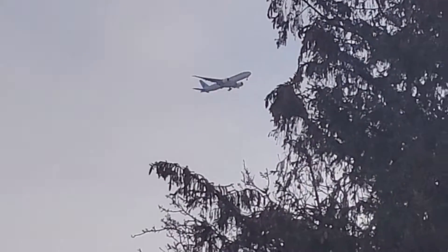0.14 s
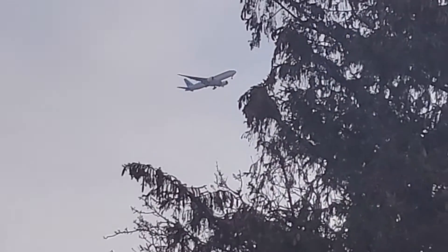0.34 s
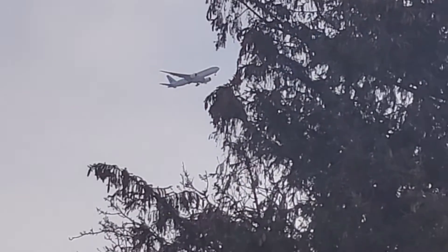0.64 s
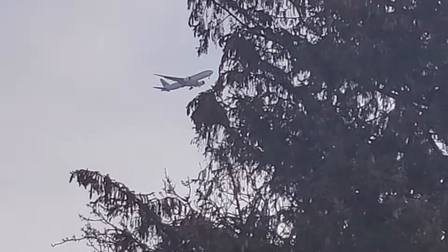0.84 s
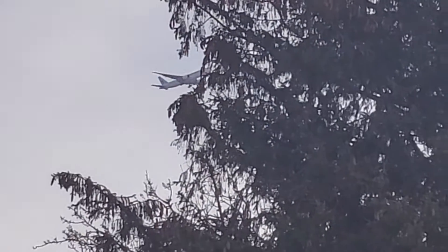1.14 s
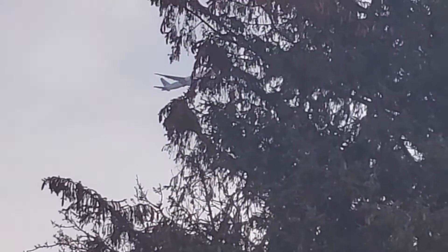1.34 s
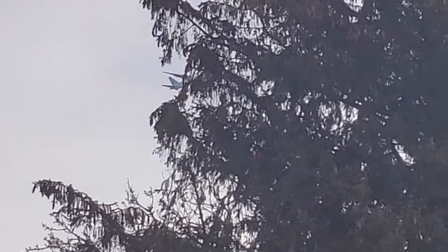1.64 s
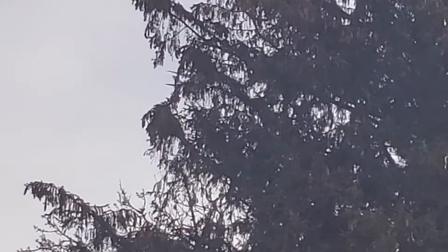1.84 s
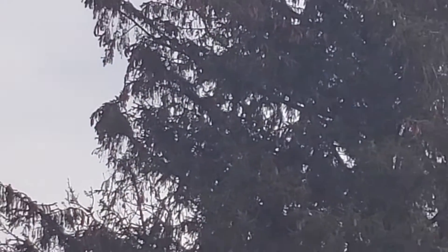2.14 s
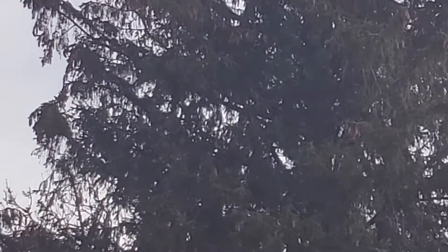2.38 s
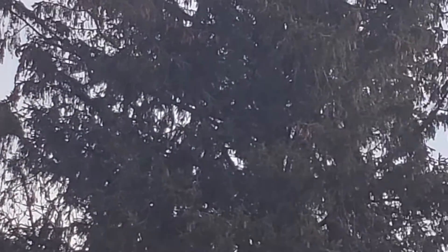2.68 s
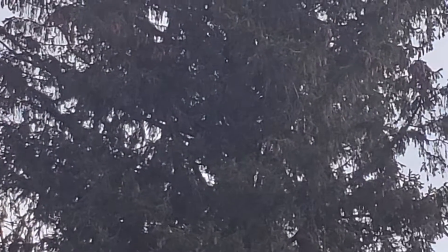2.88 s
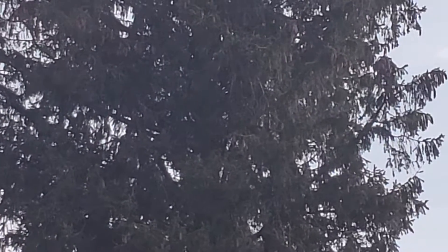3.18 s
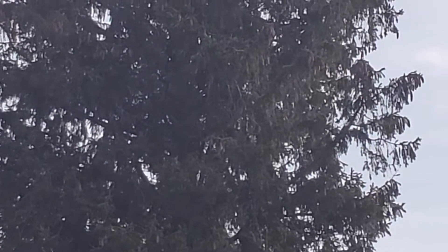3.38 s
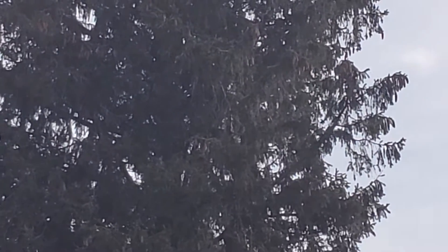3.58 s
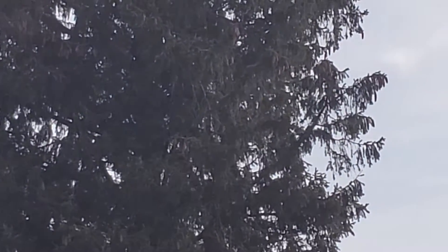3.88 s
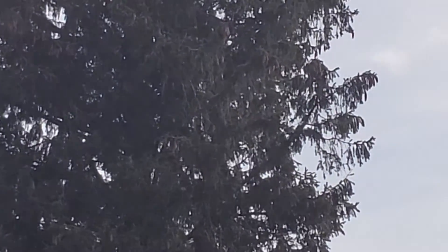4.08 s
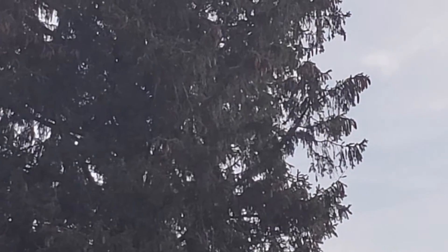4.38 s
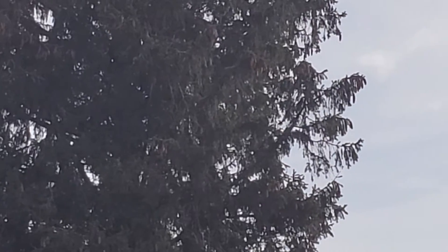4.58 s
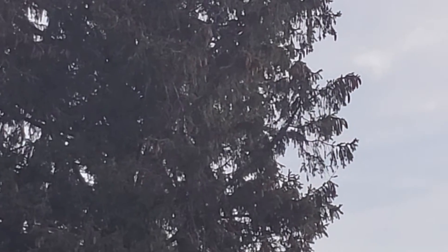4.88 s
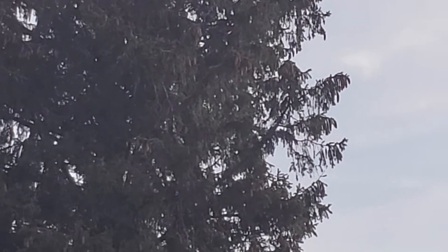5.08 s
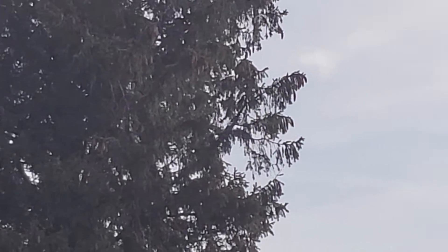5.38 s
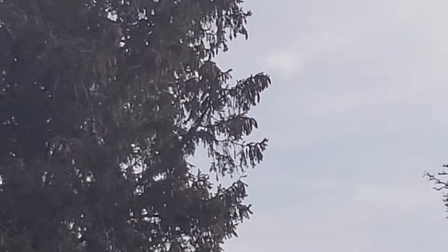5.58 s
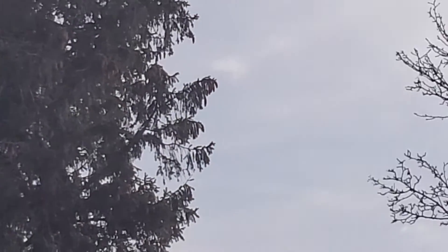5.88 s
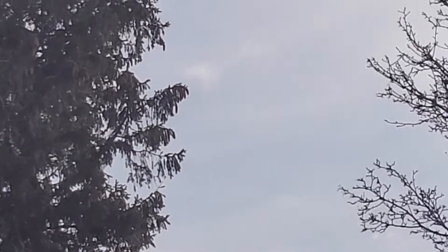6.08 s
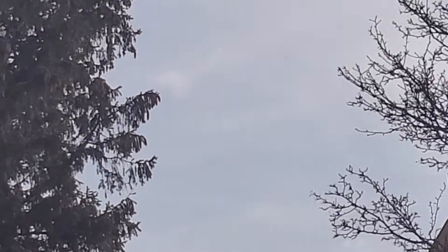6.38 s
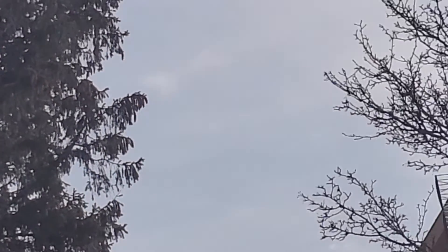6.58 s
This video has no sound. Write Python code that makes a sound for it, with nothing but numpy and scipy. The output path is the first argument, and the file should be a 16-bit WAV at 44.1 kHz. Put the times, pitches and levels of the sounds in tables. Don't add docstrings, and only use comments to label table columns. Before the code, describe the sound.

A distant jet airliner's deep rumble and wavering roar swell and dip outdoors while sparrows, a tit and far birds chirp among trees.

```python
import sys
import numpy as np
from scipy import signal
from scipy.fft import rfft, irfft, next_fast_len
from scipy.io import wavfile
from scipy.ndimage import uniform_filter1d, map_coordinates

SR = 44100
rng = np.random.default_rng(int(sys.argv[2]) if len(sys.argv) > 2 else 0)


def level_to_linear(level):
    exponent = np.asarray(level, float) / 20
    return 10 ** exponent


def store_wav(level_fs):
    pcm = np.round(np.clip(np.atleast_2d(level_fs), -1, 1) * 32767)
    wavfile.write(sys.argv[1], SR, pcm.T.astype(np.int16))


N = 296793


def unit(x):
    return x / np.sqrt(np.mean(x ** 2) + 1e-20)


def along(points, hz):
    f, v = np.transpose(points)
    return np.interp(np.log(hz + 1), np.log(f + 1), v)


def curves(rows):
    s, *columns = np.transpose(rows)
    return [np.interp(np.arange(N) / SR, s, column) for column in columns]


def swells(rows, width_s, rest_db):
    s, db = np.transpose(rows)
    t = np.arange(0, N + 512, 256) / SR
    bells = np.exp(-((t - s[:, None]) / width_s) ** 2)
    power = level_to_linear(2 * rest_db) + level_to_linear(2 * db) @ bells
    return np.interp(np.arange(N) / SR, t, 10 * np.log10(power))


def wobble(rate, size=N):
    knots = rng.standard_normal(int(size * rate / SR) + 4)
    return map_coordinates(knots, [np.arange(size) * rate / SR])


def filtered(x, response):
    m = next_fast_len(N + 8192)
    return irfft(rfft(x, m) * response(np.fft.rfftfreq(m, 1 / SR)), m)[..., :N]


def ports(pair, alike, lead, pan_db):
    def mixing(hz):
        turn = np.arccos(np.clip(along(alike, hz), 0, 1)) / 2
        return np.array([np.cos(turn), np.sin(turn)])

    mid, side = filtered(pair, mixing)
    both = np.array([mid + side, mid - side]) * level_to_linear([[pan_db / 2], [-pan_db / 2]])
    return filtered(both, lambda hz: np.exp(.5j * along(lead, hz) * np.array([[1], [-1]])))


def rush(spectrum, patchy_db):
    z = signal.stft(rng.standard_normal((2, N)), nperseg=1024)[2]
    field = uniform_filter1d(rng.standard_normal(z.shape[1:]), size=6, axis=0)
    field = uniform_filter1d(field, size=8, axis=1)
    pair = signal.istft(z * level_to_linear(patchy_db * unit(field)), nperseg=1024)[1][:, :N]
    return unit(filtered(pair, lambda hz: level_to_linear(along(spectrum, hz))))


def evened(pair):
    even_s, share = .055, .5
    power = uniform_filter1d(pair[0] ** 2, round(even_s * SR))
    power = uniform_filter1d(power, round(even_s * SR / 2))
    level = np.abs(power) + 1e-3
    return unit(pair / level ** (share / 2))


def engine_tone(hz, db, width_hz):
    turns = np.exp(2j * np.pi * np.cumsum(hz) / SR)
    pair = [np.real(turns * (wobble(width_hz) + 1j * wobble(width_hz))) for _ in range(2)]
    return level_to_linear(db) * unit(np.array(pair))


def whistle(notes, bow_hz, clear_speed, rasp_hz, flutter_db, edge):
    out = np.zeros(N + SR)
    for s, length, start_hz, end_hz, db in notes:
        u = np.linspace(0, 1, round(length * SR))
        hz = start_hz + (end_hz - start_hz) * u + bow_hz * 4 * u * (1 - u)
        harsh = np.clip(abs(end_hz - start_hz) / length / clear_speed, 0, 1)
        rasp = wobble(rasp_hz, size=len(u)) + 1j * wobble(rasp_hz, size=len(u))
        voice = np.sqrt(1 - harsh) + np.sqrt(harsh / 2) * rasp
        swell = np.sin(np.pi * u) ** edge * level_to_linear(db + 6.5 + flutter_db * wobble(160, size=len(u)))
        out[round(s * SR):][:len(u)] += swell * np.real(voice * np.exp(2j * np.pi * np.cumsum(hz) / SR))
    return out[:N]


def sung(calls, phrase):
    notes = []
    for s, db, pace, *sweep in calls:
        for delay, length, start_hz, end_hz, more_db in phrase:
            centre = (start_hz + end_hz) / 2
            half = (start_hz - end_hz) / 2 * np.prod(sweep)
            notes.append((s + delay * pace, length, centre + half, centre - half, db + more_db))
    return notes


# frequency in Hz, time to fall by 60 dB in seconds.
TREE_DECAY = [(2600, .27), (3300, .42), (4200, .85), (5000, .9), (8000, .45)]


def among_trees(x, lag_s, pan_db, wet_db, slap_s, slap_db):
    hz, t, z = signal.stft(rng.standard_normal((2, SR)), SR, nperseg=256)
    decay = level_to_linear(-60 * t / along(TREE_DECAY, hz)[:, None])
    tail = signal.istft(z * decay * (hz > 1500)[:, None], SR, nperseg=256)[1]
    tail = tail / np.linalg.norm(tail[0])
    wet = signal.fftconvolve(np.pad(x, (500, 0))[None], tail, axes=1)[:, :N]
    side = np.array([[1], [-1]])

    def path(f):
        echo = 1 - level_to_linear(slap_db) * np.exp(-2j * np.pi * f * slap_s)
        return np.exp(-1j * np.pi * f * lag_s * side) / echo

    return filtered(x, path) * level_to_linear(side * pan_db / 2) + level_to_linear(wet_db) * wet


# frequency in Hz, density in dB per Hz.
HISS_SPECTRUM = [(4410, -36.5), (7500, -6), (8570, -2), (9750, -3.5), (12500, -1), (15100, -0.5),
                 (15700, -10)]


def microphone_hiss():
    return level_to_linear(-81) * rush(HISS_SPECTRUM, patchy_db=1.5)


# frequency in Hz, density in dB per Hz.
CHORUS_SPECTRUM = [(1240, -18.5), (2100, -7.5), (3100, -6.5), (3820, -7), (4250, -11.5), (4900, -22.5),
                   (6370, -49.5), (10800, -120)]
CHORUS_TOP_SPECTRUM = [(2820, -28.5), (4800, -4.5), (6500, -13), (7200, -20), (9360, -51.5), (15800, -120)]
# time in seconds, level in dB.
FLURRIES = [(.67, -64), (1.1, -67), (1.85, -62), (2.46, -64.5), (2.74, -66), (3.4, -64.5), (3.65, -64),
            (4.25, -63.5), (4.83, -62), (5.5, -65), (6.0, -62.5), (6.6, -64.5)]


def bird_chorus():
    low_db = swells(FLURRIES, width_s=.23, rest_db=-66.5)
    top_db = low_db.mean() + 3.1 * (low_db - low_db.mean()) - 16
    blur = level_to_linear(low_db) * rush(CHORUS_SPECTRUM, patchy_db=3.0)
    blur += level_to_linear(top_db) * rush(CHORUS_TOP_SPECTRUM, patchy_db=-4.5)
    return ports(blur, [(2000, .35), (7000, .18)], [(2000, 1.9), (7000, 1.4)], pan_db=4.0)


# start in seconds, length in seconds, start and end pitch in Hz, level in dB.
DISTANT_NOTES = [(.01, 0.071, 2860, 2580, -60), (.495, 0.078, 2280, 3000, -53.5),
                 (.54, 0.038, 2950, 2630, -54), (.565, 0.072, 2680, 3030, -54),
                 (1.96, .04, 3350, 3200, -60), (2.262, .075, 3450, 2800, -52),
                 (2.343, .032, 3720, 2950, -52), (2.372, .025, 3050, 3350, -55),
                 (2.77, 0.067, 4100, 3880, -64), (3.3, .06, 3470, 3430, -71),
                 (3.44, 0.047, 3350, 3250, -64), (4.055, .038, 4200, 3340, -63),
                 (4.79, 0.024, 3500, 3570, -52.5), (4.94, .04, 2510, 2500, -61.5),
                 (5.655, .075, 2750, 4300, -58), (5.725, .04, 3410, 2880, -54),
                 (5.915, 0.031, 4080, 3980, -62.5), (6.06, 0.07, 2690, 2620, -61)]
CHATTER_NOTES = [(1.735, 0.071, 6400, 4700, -67), (2.8, 0.084, 3480, 3420, -52.5),
                 (3.48, 0.043, 3630, 2900, -54.5), (3.965, 0.036, 3490, 4080, -55.5),
                 (4.17, 0.078, 4110, 2960, -54), (5.6, 0.083, 5150, 4560, -54.5),
                 (5.67, 0.11, 4040, 3920, -52.5), (5.77, 0.032, 3400, 4040, -54.5),
                 (6.63, 0.035, 3210, 2980, -57.5), (6.66, 0.079, 8350, 7450, -87)]
ARCHED_CALLS = [
    (1.712, .11, 3500, 3600, -63),
    (5.243, .1, 3400, 3300, -62),
]
# start in seconds, level in dB, pace ratio.
FINCH_CALLS = [
    (.47, -67, 1),
    (1.36, -70, 1),
    (4.92, -74, 1),
]
# delay in seconds, length in seconds, start and end pitch in Hz, level in dB.
FINCH_NOTES = [
    (0, 0.06, 2770, 3550, 2.1),
    (0.033, 0.224, 3390, 3280, 0.88),
]


def far_birds():
    clear = DISTANT_NOTES + sung(FINCH_CALLS, FINCH_NOTES)
    far = whistle(clear, bow_hz=0, clear_speed=30000, rasp_hz=400, flutter_db=3, edge=.6)
    far += whistle(ARCHED_CALLS, bow_hz=1240, clear_speed=60000, rasp_hz=400, flutter_db=2.5, edge=.25)
    far += whistle(CHATTER_NOTES, bow_hz=0, clear_speed=900, rasp_hz=1200, flutter_db=1.5, edge=.7)
    return among_trees(level_to_linear(-8) * far, -13.5 / SR, pan_db=3.5, wet_db=-8, slap_s=.045, slap_db=-18)


# start in seconds, level in dB, pace ratio.
TIT_CALLS = [(.458, -59, 1.15), (1.036, -63, 0.95), (1.666, -57, 0.93), (2.252, -59.5, 0.95),
             (2.836, -57, 1.01), (3.631, -55.5, 1.02), (4.752, -60, 0.92), (6.049, -56, .95)]
# delay and length in seconds, start and end pitch in Hz, dB.
TIT_NOTES = [
    (0, .065, 4770, 4700, -1),
    (.005, .06, 9520, 9400, -33),
    (0.069, .07, 6900, 5950, -15),
    (.125, .032, 4330, 4220, -1.5),
    (-.004, .008, 6200, 5300, -18),
    (.121, .01, 6700, 5000, -18),
    (.07, .06, 4760, 4720, -15),
]


def tit():
    song = whistle(sung(TIT_CALLS, TIT_NOTES), bow_hz=20, clear_speed=25000, rasp_hz=600,
                   flutter_db=4, edge=.55)
    return among_trees(song, -2.2 / SR, pan_db=-3.2, wet_db=-9, slap_s=.085, slap_db=-15)


# start and length in seconds, start and end pitch in Hz, level
# in dB.
NEARBY_NOTES = [(1.712, .035, 3550, 4150, -59), (1.728, .035, 5000, 5900, -66),
                (1.742, .032, 4600, 4750, -56), (1.752, .04, 4400, 2600, -58),
                (1.76, .035, 3150, 3000, -60), (1.75, .05, 6100, 6250, -67),
                (1.855, .06, 3050, 3450, -62), (1.915, .028, 2930, 2800, -61),
                (1.12, .045, 6250, 6150, -68), (3.455, .022, 5500, 4800, -63),
                (3.57, .055, 3600, 4460, -58), (3.628, .03, 4500, 3550, -61),
                (4.657, .025, 6200, 5200, -64), (4.682, .03, 6200, 5000, -64),
                (4.662, .02, 4700, 3750, -58), (4.7, .02, 3700, 4100, -60),
                (5.725, .035, 4720, 4350, -60)]
# start in seconds, level in dB, pace ratio, sweep ratio.
UPSWEEP_CALLS = [
    (.135, -46, 1, .85),
    (.915, -47.5, 1, 1.5),
]
CHIRRUP_CALLS = [
    (2.515, -45, 1.12, .85),
    (4.635, -49.5, 1, 1.15),
    (6.28, -49.5, .91, 1),
]
CHIRRUP_HARSH_DB = [-2, -3, 2.5]
# delay in seconds, length in seconds, start and end pitch in Hz, level in dB.
UPSWEEP_VOICES = [
    (.04, .1, 3550, 4400, -1),
    (.105, .06, 4250, 4150, -6),
    (.035, .05, 3200, 3850, -7),
]
UPSWEEP_LOW_VOICE = [
    (.015, .07, 2780, 3250, -1),
]
UPSWEEP_SLIDES = [
    (0, .06, 5050, 5800, -17),
    (.038, .053, 6150, 7350, -25),
    (.085, .085, 3450, 3950, -5),
    (.095, .06, 8200, 8800, -33),
]
CHIRRUP_VOICES = [
    (0, .04, 2700, 2500, -14),
    (.088, .074, 2600, 2700, -1.5),
    (.09, .072, 2800, 3120, -6),
]
CHIRRUP_SLIDES = [
    (-.004, .048, 5300, 4900, -15),
    (.022, .056, 4500, 3550, -7),
    (.055, .05, 3600, 4600, -7),
    (.043, .04, 2950, 3200, -9),
    (.08, .05, 4900, 6150, -21),
    (.075, .03, 2450, 2800, -9),
]


def near_sparrow():
    unswept = [call[:3] for call in UPSWEEP_CALLS]
    clean = sung(UPSWEEP_CALLS, UPSWEEP_VOICES) + sung(unswept, UPSWEEP_LOW_VOICE)
    sparrow = whistle(clean, bow_hz=95, clear_speed=11000, rasp_hz=450, flutter_db=4, edge=.9)
    sparrow += whistle(NEARBY_NOTES, bow_hz=0, clear_speed=60000, rasp_hz=500, flutter_db=2.5, edge=.6)
    harsh_calls = [(s, db + more, *shape) for (s, db, *shape), more in zip(CHIRRUP_CALLS, CHIRRUP_HARSH_DB)]
    slides = sung(unswept, UPSWEEP_SLIDES) + sung(harsh_calls, CHIRRUP_SLIDES)
    sparrow += whistle(slides, bow_hz=0, clear_speed=900, rasp_hz=1150, flutter_db=1.5, edge=.7)
    chirrup = whistle(sung(CHIRRUP_CALLS, CHIRRUP_VOICES), bow_hz=130, clear_speed=7000, rasp_hz=400,
                      flutter_db=4, edge=.5)
    return (among_trees(sparrow, 18.5 / SR, pan_db=2.2, wet_db=-6.5, slap_s=.11, slap_db=-22)
            + among_trees(chirrup, 18.5 / SR, pan_db=2.2, wet_db=-13, slap_s=.1, slap_db=-20))


# frequency in Hz, density in dB per Hz.
CLOTH_SPECTRUM = [(2500, -17.5), (5000, 4), (8000, -14), (11000, -10), (15000, -3.5), (16500, -7)]
# start in seconds, peak in dB, share of the top band in dB.
SCRAPES = [(3.294, -69, -22), (3.362, -65, -22), (3.588, -68, -11), (3.794, -72, -8.5), (3.8424, -61.5, -2),
           (3.8505, -54, -2), (3.857, -60, -4), (3.862, -62, -11), (3.896, -67, -6), (3.973, -59, -14),
           (4.0275, -63, -26), (4.035, -63, -24), (4.038, -65, -24), (4.133, -63, -11), (4.145, -58, -2),
           (4.156, -57, -2), (4.167, -57, -11), (4.14, -55, -2), (4.15, -53, -2), (4.162, -50, -10.8),
           (4.179, -48, -11), (4.207, -67, -11.5), (4.2438, -68, -11), (4.329, -66, -11), (4.335, -58, -8),
           (4.341, -62, -2), (4.4408, -63, -6), (4.452, -67, -14), (4.445, -63, -2), (4.483, -66, -12),
           (4.508, -69, -20)]
KNOCKS = (3.862, 3.973, 4.179, 4.452, 4.483, 4.508)
# time in seconds, level in dB.
RUBBING_LEVEL = [
    (3.1, -87.5),
    (3.9, -74),
    (4.36, -80.5),
    (4.8, -82.5),
]


def sleeve():
    t = np.arange(N) / SR
    cloth = rush(CLOTH_SPECTRUM, patchy_db=0.0)
    bands = filtered(cloth[:, None],
                     lambda hz: np.array([hz < 8000, (hz >= 8000) & (hz < 12000), hz >= 12000]))
    shape = np.zeros((3, N))
    scrape_s = .0024
    for s, db, high_db in SCRAPES:
        low_db = -12 + 9 * np.any(np.isclose(s, KNOCKS, atol=.004))
        high_db = min(high_db + 10, -.6)
        rest_db = 10 * np.log10(1 - level_to_linear(2 * high_db))
        mid_db = rest_db - 3 * (high_db > -9)
        u = np.maximum(t - s + .0006, 0) / scrape_s
        shape += level_to_linear(db + 2.0 + np.array([[low_db], [mid_db], [high_db]])) * u * np.exp(1 - 2 * u)
    scrapes = sum(unit(bands[:, k]) * shape[k] for k in range(3)) * level_to_linear(1.2 * wobble(400))
    touching = (t > RUBBING_LEVEL[0][0]) * (t < RUBBING_LEVEL[-1][0])
    rubbing = level_to_linear(curves(RUBBING_LEVEL)[0] + 2.0 + 1.5 * wobble(40)) * touching * cloth
    return ports(scrapes + rubbing, [(8000, .2)], [(8000, .0031)], pan_db=8.0)


# time in seconds, level in dB.
FAN_FOCUSES = [(.32, -37.5), (.66, -38.5), (.95, -38), (1.3, -41.5), (1.55, -39.5), (1.93, -42.5),
               (2.4, -43.5), (2.75, -57), (3.18, -41.5), (3.56, -35), (4.15, -45), (4.46, -41.5),
               (4.82, -35), (5.42, -50), (5.75, -36.5), (6.03, -38), (6.65, -37.5)]


def fan_tone(shift):
    return engine_tone(550 * shift, swells(FAN_FOCUSES, width_s=.065, rest_db=-50.5), width_hz=55)


def shaft_tone(shift, strength_db, depth_db, lumps_db):
    growth_db = .67 * np.arange(N) / SR
    db = strength_db + .19 * depth_db + .55 * lumps_db - 9.5 + growth_db
    return level_to_linear(db) * evened(engine_tone(99 * shift, 0, width_hz=9))


# time in seconds, level in dB.
SIDE_TONE_LEVEL = [
    (.6, -57),
    (1.45, -43.5),
    (5.45, -40.5),
    (6.3, -54.5),
]


def side_tone(shift):
    highest = shift.max()
    hz = 439 * (highest + .25 * (shift - highest))
    return engine_tone(hz, swells(SIDE_TONE_LEVEL, width_s=.17, rest_db=-58), width_hz=32)


# frequency in Hz, density in dB per Hz.
ROAR_SPECTRUM = [(230, -10), (390, -5), (424, -5.5), (581, 0), (791, -9), (920, -11.5), (1200, -29.5),
                 (2020, -120)]
UPPER_SPECTRUM = [(520, -36.5), (880, -5), (1200, -3.5), (2300, -22), (2990, -55), (5060, -120)]


def roar(air_db):
    upper_db = air_db.mean() + .73 * (air_db - air_db.mean()) - 9.5
    sound = level_to_linear(air_db - 1) * rush(ROAR_SPECTRUM, patchy_db=1.34)
    return sound + level_to_linear(upper_db) * rush(UPPER_SPECTRUM, patchy_db=2.0)


# frequency in Hz, density in dB per Hz.
RUMBLE_SPECTRUM = [(12, -40), (25, -20.5), (44, -7.5), (64, 0), (105, 1.5), (140, -20), (180, -33),
                   (310, -120)]
DRONE_SPECTRUM = [(74, -38.5), (125, -3), (140, 2), (242, -5.5), (323, -6), (420, -16), (550, -53.5),
                  (920, -120)]
# time in seconds, gain in dB.
DRONE_FORWARD = [
    (.55, 5),
    (.72, 2),
    (1.0, 5.6),
    (5.65, 4.9),
    (6.05, 0.89),
]


def rumble(air_db, depth_db, lumps_db):
    rumble_db = air_db + depth_db + lumps_db + 1 + .46 * wobble(10)
    drone_db = air_db + .98 * depth_db + .37 * lumps_db - 6.5
    drone_db += swells(DRONE_FORWARD, width_s=.14, rest_db=1.5)
    sound = level_to_linear(rumble_db) * evened(rush(RUMBLE_SPECTRUM, patchy_db=.5))
    return sound + level_to_linear(drone_db) * rush(DRONE_SPECTRUM, patchy_db=1.7)


# time in seconds, strength in dB, depth of bass over roar in dB.
JET_LEVEL = [(0, -37, 5), (.3, -34, 7), (.64, -37.5, 7), (.86, -37.5, 10), (1.1, -37, 3.5),
             (1.45, -36.5, 3.5), (2.08, -40, 1.5), (2.8, -42, 2.5), (2.96, -44.5, 1), (3.17, -41.5, 4.5),
             (3.36, -40.5, 2), (3.52, -37, 1.5), (4.1, -37.5, 3), (4.95, -35.5, 1.5), (5.2, -37.5, 3),
             (6.05, -33, 2), (6.4, -38.5, 5.5), (6.73, -37.5, 2)]
# time in seconds, gain in dB.
EXHAUST_LUMPS = [(.05, 0), (.15, 5.5), (.28, 3), (.46, 3), (.54, 5.5), (.7, 4), (.75, 7), (.88, 10),
                 (.95, 0), (1.18, 6), (1.26, 5), (1.37, 4.5), (1.6, 3.5), (1.8, 6), (2.05, 3), (2.3, 1),
                 (2.58, 8), (2.73, 4), (3.1, 1.5), (3.48, 9), (3.8, 2.5), (4.25, 2.5), (4.38, 4.5),
                 (4.65, 2.5), (4.85, 7.5), (5.05, 6.5), (5.18, 3.5), (5.62, 6), (5.85, 4), (6.02, 2),
                 (6.16, 2.5), (6.3, 4.5), (6.6, 4.5)]
# time in seconds, frequency ratio.
DOPPLER_SHIFT = [(0, 1.05), (1., 1.066), (2.5, 1.064), (3.2, 1.015), (3.6, 1.), (4.5, .975), (5.5, .962),
                 (6.73, .957)]
# frequency in Hz, coherence from 0 to 1.
JET_COHERENCE = [(40, .48), (90, .66), (180, .72), (350, .8), (600, .86), (1200, .76), (2200, .65)]
# frequency in Hz, phase in radians.
JET_PHASE_LEAD = [(20, 0), (100, .13), (300, .33), (600, .4), (800, .85), (1000, 1.2), (1550, 2.),
                  (2070, 2.3)]


def jet():
    strength_db, depth_db = curves(JET_LEVEL)
    air_db = strength_db + .8 * wobble(7)
    lumps_db = swells(EXHAUST_LUMPS, width_s=.025, rest_db=-.36)
    shift = curves(DOPPLER_SHIFT)[0]
    sound = rumble(air_db, depth_db, lumps_db) + roar(air_db)
    sound += fan_tone(shift) + side_tone(shift)
    sound += shaft_tone(shift, strength_db, depth_db, lumps_db)
    return ports(sound, JET_COHERENCE, JET_PHASE_LEAD, pan_db=1.0)


def scene():
    birds = bird_chorus() + far_birds() + tit() + near_sparrow()
    return birds + sleeve() + jet()


def low_pass(x):
    return signal.sosfilt(signal.butter(12, 16180, fs=SR, output="sos"), x)


def record(dry):
    mix = filtered(dry + microphone_hiss(), lambda hz: hz < 15800)
    return low_pass(mix)


dry = scene()
out = record(dry)
store_wav(out)
```